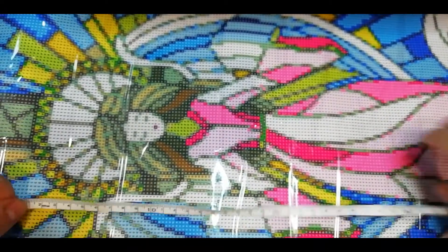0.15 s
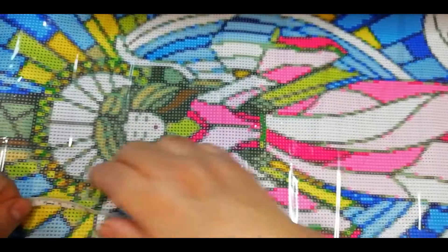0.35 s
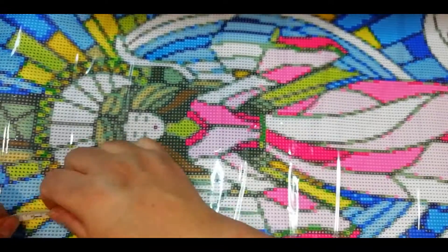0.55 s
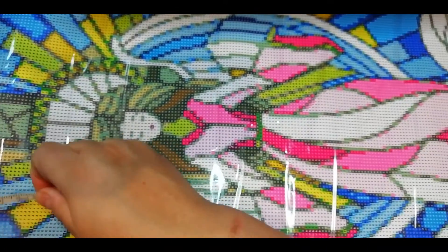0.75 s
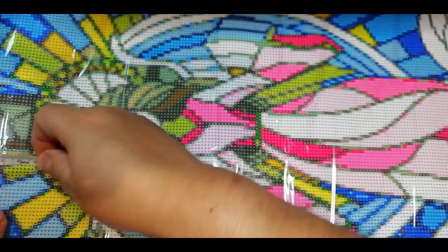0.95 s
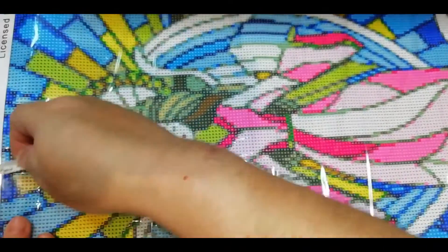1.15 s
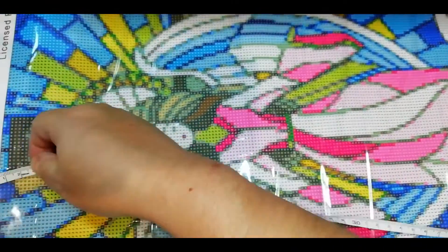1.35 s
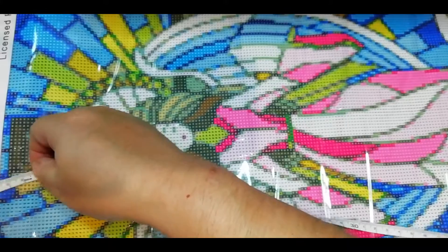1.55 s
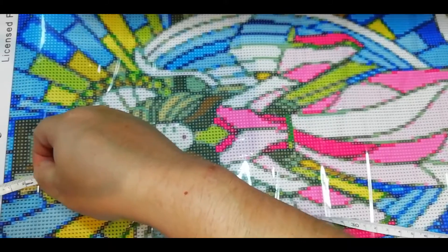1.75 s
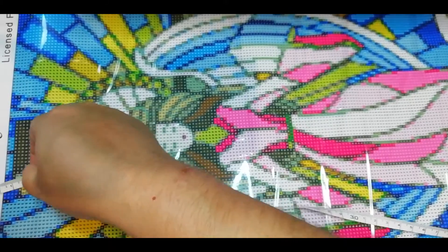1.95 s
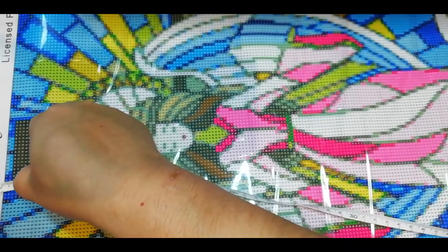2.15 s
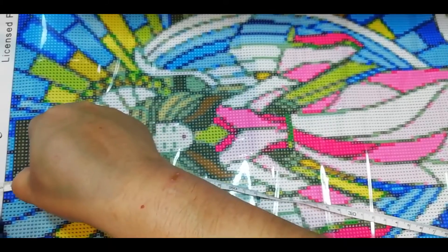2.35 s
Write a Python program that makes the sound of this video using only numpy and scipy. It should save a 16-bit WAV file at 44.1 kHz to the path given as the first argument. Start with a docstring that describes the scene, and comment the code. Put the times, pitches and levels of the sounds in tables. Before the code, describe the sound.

Close, stereo crinkling of thin plastic film on canvas, loudest snap and pock near the start, then a rustling swish, sparse clicks and dull bumps, while a soft tape slides faintly in a small hissy room.

```python
"""Clear film and soft tape on a canvas

A hand presses clear plastic film on a canvas and drags a soft tape over it, close under a phone in a small room.
The film snaps and crackles (bursts of clicks), pocks (short tones), swishes under the fingers (grains and
noise) and squeaks once; the tape slides and something scrapes dully (bands of noise).
The table thumps (fading low tones) and knocks (low noise); a quiet room hiss and a faint shake lie under all.
"""
import sys
import numpy as np
from scipy import signal
from scipy.fft import rfft, irfft, next_fast_len
from scipy.io import wavfile
from scipy.ndimage import map_coordinates

SR = 44100
rng = np.random.default_rng(int(sys.argv[2]) if len(sys.argv) > 2 else 0)


def output_pcm(signal):
    """Save a mono or channel-first signal as 16-bit PCM at the path in sys.argv[1].

    Samples are clipped to [-1, 1] before scaling.
    """
    pcm = np.clip(np.atleast_2d(signal).T, -1, 1) * 32767
    wavfile.write(sys.argv[1], SR, np.round(pcm).astype(np.int16))


N = 110250  # samples, 2.5 s

# Snaps of the film: [t/s, level/dB before room and placing]
FILM_SNAPS = [(0.2065, -26), (0.2509, -14.5), (0.3565, -11.5), (0.3698, -13), (0.4785, -28),
              (0.5642, -21.5), (0.605, -30.5), (0.6925, -22), (0.9896, -31), (1.3057, -19.5),
              (1.3245, -32.5), (1.5369, -23), (1.5446, -27), (1.5825, -24.5), (1.6271, -13),
              (1.6932, -22.5), (1.7731, -25), (1.8346, -23), (1.9334, -30), (2.134, -35.5), (2.2143, -36),
              (2.3312, -41)]
SNAP_MID_DB = -11.5  # the band under the split, against the treble
BURST_S, BURST_DB = 0.0012, -2.5  # time scale of the weaker cracks; their joint energy against the main crack


def snaps():
    """Each snap is one crack amid a tight burst of weaker ones, in the film's colour."""
    out = np.zeros((2, N + SR))
    click = tilted(causal(FILM_COLOUR), amp(SNAP_MID_DB))
    u = np.arange(128) / SR / BURST_S
    for start, db in FILM_SNAPS:
        # cubing the noise makes a few cracks stand out
        burst = u ** 2 * np.exp(-4 * u) * rng.standard_normal(len(u)) ** 3
        burst *= amp(BURST_DB) / np.linalg.norm(burst)
        burst[round(BURST_S * SR / 2)] = 1  # the main crack, where the burst is densest
        snap = amp(db) * np.convolve(click, burst)
        out = placed(out, start + 0.00054, snap, 0)
    return out[:, :N]


# Hollow pocks as film and tape slap the canvas: [t/s, f/Hz, level/dB before swell and placing]
CANVAS_POCKS = [(0.2059, 1950, -16.5), (0.354, 1090, -20), (0.370, 1900, -14), (0.3832, 2860, -5.5),
                (0.4233, 2960, -27), (0.565, 1510, -36.5), (1.132, 2220, -19.5), (1.3118, 925, -27.5),
                (1.537, 3480, -15.5), (1.5384, 990, -31), (1.589, 1090, -39), (1.696, 1060, -23),
                (1.832, 910, -34), (1.841, 920, -34.5), (1.856, 930, -36), (1.9339, 3180, -23.5),
                (2.045, 2440, -36.5), (2.1351, 3180, -27.5), (2.3336, 3950, -31), (2.476, 2890, -39)]
RING_CYCLES = 10  # cycles in which a pock fades by 60 dB
POCK_ROOM_DB = -9


def pocks():
    """Each pock is a few cycles at one pitch, swelling over the first and fading fast."""
    out = np.zeros((2, N + SR))
    t = np.arange(1024) / SR
    for start, hz, db in CANVAS_POCKS:
        fade = amp(db - 60 * t * hz / RING_CYCLES)
        swell = 1 - np.exp(-2 * t * hz)
        ring = fade * swell * np.sin(2 * np.pi * hz * t)
        out = placed(out, start, ring, POCK_ROOM_DB)
    return out[:, :N]


# Strokes of hand and tape over the film:
# [t/s, rise/s, hold/s, fall/s, treble level/dB before placing and flicker, mid band over treble/dB]
HAND_STROKES = [(.0, 0.0027, 0.26, 0.079, -56, 3), (0.15, 0.0045, 0.022, 0.081, -37.5, -12),
                (0.23, 0.02, 0.0098, 0.11, -31.5, -7), (0.353, 0.0026, 0.032, 0.098, -27, -4.5),
                (0.758, 0.031, 0.063, 0.15, -49.5, 1.5), (1.019, 0.11, 0.035, 0.092, -31.5, 2.5),
                (1.309, 0.0036, 0.047, 0.18, -49, -4), (1.432, 0.0035, 0.026, 0.022, -41, -3.5),
                (1.497, 0.058, 0.4, 0.15, -48, 4.5), (1.815, 0.017, 0.027, 0.041, -38, -2.5)]
EDGE_DB = 26  # a stroke rises from this far under its top, and drops this far in its fall time
GRAINS_PER_S, GRAIN_SPREAD_DB, GRAIN_SHARE = 2500, 4, 0.4  # share of the power going into grains
RUSTLE_ROOM_DB = -4


def rustle():
    """Each stroke is tiny crackling grains over friction hiss, in the film's colour."""
    out = np.zeros((2, N + SR))
    colour, size = causal(FILM_COLOUR), SR // 2
    t = np.arange(size) / SR
    for start, rise, hold, fall, db, mid_db in HAND_STROKES:
        chance, strength, sign = rng.random((3, size))
        hits = chance < GRAINS_PER_S / SR
        sizes = amp(-GRAIN_SPREAD_DB * np.log(strength + 0.02))
        grains = unit(hits * sizes * np.sign(sign - 0.5))
        right_grains = np.roll(grains, round(place(start) * LAG_S_PER_DB * SR))
        friction = rng.standard_normal((2, size))
        stroke = np.sqrt(1 - GRAIN_SHARE) * friction + np.sqrt(GRAIN_SHARE) * np.array([grains, right_grains])
        stroke = signal.fftconvolve(stroke, colour[None], axes=1)[:, :size]
        stroke = tilted(stroke, amp(mid_db))

        # distance from the top of the stroke: 0 while held, 1 at the edges
        before = np.clip(1 - t / rise, 0, 1) ** 2.87
        after = np.clip((t - rise - hold) / fall, 0, 10) ** 0.88
        side_db = np.array([[0.5], [-0.5]]) * place(start)
        treble = np.std(filtered(stroke, lambda hz: hz > SPLIT_HZ))
        stroke = stroke / treble * amp(db - EDGE_DB * (before + after) + side_db)
        out[:, round(start * SR):][:, :size] += stroke
    direct = out[:, :N] * amp(1.2 * wobble(80))  # the level flickers a little
    room = signal.fftconvolve(direct.mean(0)[None], tail(), axes=1)[:, :N]
    return direct + amp(RUSTLE_ROOM_DB) * room


# Short squeak of the film: [t/s, length/s, start f/Hz, end f/Hz, level/dB before flicker]
FILM_SQUEAKS = [(0.802, 0.0357, 855, 1370, -50)]


def squeak():
    """A tone gliding from one pitch to another, swelling and fading with a flickering level."""
    out = np.zeros(N + SR)
    t = np.arange(SR // 2) / SR
    for start, length, hz0, hz1, db in FILM_SQUEAKS:
        u = np.clip(t / length, 0, 1)
        level = amp(db + 4 * wobble(300)[:len(t)]) * np.sin(np.pi * u ** 1.6)
        pitch = hz0 + (hz1 - hz0) * u
        out[round(start * SR):][:len(t)] += level * np.sin(2 * np.pi * np.cumsum(pitch) / SR)
    return out[:N]


# The tape drawn along: [t/s, centre f/Hz, level/dB of the middle signal]
TAPE_SLIDE = [(.0, 1295, -60.5), (.33, 1522, -58.5), (0.56, 1400, -60.5), (.68, 1620, -56),
              (1.031, 1424, -59), (1.2, 1494, -75), (1.9, 2451, -64.5), (2.21, 2300, -65.5),
              (2.5, 1758, -73)]
SLIDE_WIDTH_HZ = 356  # between the half-amplitude points


def slide():
    """The sliding tape is a narrow hiss: slow noise moved up to a gliding centre pitch."""
    knots, hz_knots, db_knots = np.transpose(TAPE_SLIDE)
    t = np.arange(N) / SR
    hz, db = np.interp(t, knots, hz_knots), np.interp(t, knots, db_knots)
    slow = rng.standard_normal((4, N))
    a, b, c, d = filtered(slow, lambda f: 1 / (1 + (2 * f / SLIDE_WIDTH_HZ) ** 2))
    phase = 2 * np.pi * np.cumsum(hz) / SR
    mid = unit(a * np.cos(phase) + b * np.sin(phase))
    side = 0.4 * unit(c * np.cos(phase) + d * np.sin(phase))
    return amp(db) * np.array([mid + side, mid - side])


# One dull scrape: [t/s, length/s, centre f/Hz, level/dB at its top]
DULL_SCRAPE = (2.085, .085, 1000, -54)


def scrape():
    """A short grainy band of noise an octave wide, swelling and fading."""
    start, length, hz, db = DULL_SCRAPE
    u = np.clip((np.arange(N) / SR - start) / length, 0, 1)
    grainy = rng.standard_normal((2, N)) ** 3
    band = filtered(grainy, lambda f: 1 / (1 + (f / hz - hz / (f + 1)) ** 2 * 2))
    swell = np.sqrt(np.abs(np.sin(np.pi * u))) * (u < 1)
    return amp(db) * swell * unit(band)


# Low swings of the table: [t/s, f/Hz at the start, level/dB before lift and rise, rise/s, time to fade 60 dB/s]
TABLE_THUMPS = [(0.076, 290, -26.5, 0.016, 0.088), (1.551, 156, -38, 0.0097, 0.1),
                (2.037, 86.5, -23, 0.0088, 0.1), (2.074, 67.5, -22, 0.0035, 0.053),
                (2.104, 89.4, -27, 0.0074, 0.11), (2.198, 46.6, -34, 0.0031, 0.2),
                (2.281, 50.6, -37.5, 0.0087, 0.17)]
THUMP_LIFT_DB = 7.5  # added to every level in the table
SAG = 0.058  # share by which the pitch falls while the thump fades by 60 dB


def thumps():
    """Each thump is a low damped swing of the table whose pitch sags a little."""
    out = np.zeros(N + SR)
    t = np.arange(SR // 2) / SR
    for start, hz, db, rise, t60 in TABLE_THUMPS:
        phase = 2 * np.pi * hz * (t - SAG * t * t / (2 * t60))
        fade = amp(db + THUMP_LIFT_DB - 60 * t / t60)
        swell = (1 - np.exp(-t / rise)) ** 2
        out[round(start * SR):][:len(t)] += fade * swell * np.sin(phase)
    return out[:N]


# Dull knocks of hand on table: [t/s, level/dB before the rise, time to fade 60 dB/s]
TABLE_KNOCKS = [(.0, -44, 0.42), (0.236, -42, 0.28), (0.351, -33, 0.44), (0.477, -40, 0.17),
                (1.31, -43, 0.41), (1.547, -40, 0.18), (2.2, -46, .5)]


def knocks():
    """Each knock is a short burst of the table's low noise, rising at once and dying away."""
    out = np.zeros((2, N + SR))
    t = np.arange(SR // 2) / SR
    for start, db, t60 in TABLE_KNOCKS:
        envelope = amp(db - 60 * t / t60) * (1 - np.exp(-t / 0.00097))
        out[:, round(start * SR):][:, :len(t)] += envelope * low_noise(len(t))
    return out[:, :N]


# Colour of the table's low noise: [f/Hz, relative level/dB per Hz]
TABLE_COLOUR = [(20, -4.5), (130, -2.5), (320, -11), (600, -23.5), (1200, -46)]


def low_noise(n):
    """The table's low noise at level 1: nearly the same left and right in the bass, wider above."""
    mid, side = filtered(rng.standard_normal((2, n)), lambda hz: amp(along(TABLE_COLOUR, hz)))
    side = filtered(side, lambda hz: np.clip(hz / 450, 0, 1))
    return unit(np.array([mid + side, mid - side]))


def table_shake():
    """The table's faint shake is its low noise with a slowly wavering level."""
    shake_db = -59
    return amp(shake_db + 0.94 * wobble(15.43)) * low_noise(N)


# Colour of the room hiss: [f/Hz, relative level/dB per Hz]
HISS_COLOUR = [(180, -40), (300, -8), (597, -12), (848, -3.5), (1110, -7.5), (1830, -10.5), (6240, -13.5),
               (8300, -4.5), (16500, -32.5)]
HISS_DB = -56.5


def room_hiss():
    """Room hiss is steady coloured noise, unrelated at the two microphone ports."""
    noise = rng.standard_normal((2, N))
    return amp(HISS_DB) * unit(filtered(noise, lambda hz: amp(along(HISS_COLOUR, hz))))


# Where the hand works: [t/s, left over right level/dB]
HAND_PLACE = [(0, 1.5), (.44, -0.5), (.55, 8.5), (1.15, 2), (1.47, 1), (1.52, 9.5), (2.5, 6.5)]
LAG_S_PER_DB = 6e-5  # the nearer port hears a sound earlier


def place(s):
    """Left over right in dB at time s."""
    return np.interp(s, *np.transpose(HAND_PLACE))


# How long the room rings: [f/Hz, time to fade 60 dB/s]
ROOM_DECAY = [(500, 0.29), (8000, 0.096), (15000, 0.13)]


def tail(size=12000):
    """A fresh stereo room tail: noise that fades at its own speed in each band, left energy 1."""
    hz, t, bands = signal.stft(rng.standard_normal((2, size)), SR, nperseg=128)
    t60 = np.maximum(along(ROOM_DECAY, hz), 0.02)[:, None]
    _, h = signal.istft(bands * amp(-60 * t / t60), SR, nperseg=128)
    h = h[:, :size]
    return h / np.linalg.norm(h[0])


ROOM_DB = 2.6  # room tail, before each sound's own room level
WALLS_DB, WALLS_S = -3.5, 0.017  # top level of near reflections, and the span of time they spread over


def placed(out, s, body, wet_db):
    """Adds a sound at time s to both ports, with near reflections and a fresh room tail."""
    space = amp(ROOM_DB) * tail()
    delay, strength = np.moveaxis(rng.random((2, 20, 2)), 2, 0)
    both = np.zeros_like(out)
    for ch in range(2):
        at_sample = (40 + delay[ch] * WALLS_S * SR).astype(int)
        # later reflections are weaker; each has a random size and sign
        echoes = amp(WALLS_DB - 10 * delay[ch]) * (2 * strength[ch] - 1)
        np.add.at(space[ch], at_sample, echoes)
        space[ch] *= amp(wet_db)
        space[ch, 0] = amp(place(s) * (1.0 - ch))  # the direct sound
        at = round((s + ch * place(s) * LAG_S_PER_DB) * SR)
        sound = signal.fftconvolve(space[ch], body)
        both[ch, at:at + len(sound)] = sound
    return out + both


# Colour of the film through the microphone: [f/Hz, relative level/dB per Hz]
FILM_COLOUR = [(400, -28.5), (900, -16.5), (1500, -10), (2150, -10.5), (4830, -10), (6800, -7), (8720, 5),
               (11500, -11), (15300, -17), (16500, -41.5)]


def causal(points, size=1024):
    """A click with the given spectrum and its energy as early as possible (minimum phase), peak 1."""
    spectrum = amp(along(points, np.fft.rfftfreq(size, 1 / SR)))
    cepstrum = irfft(np.log(np.maximum(spectrum, 1e-4)), size)
    cepstrum[1:size // 2] *= 2
    cepstrum[size // 2 + 1:] = 0
    h = irfft(np.exp(rfft(cepstrum)), size)[:size // 2]
    return h / np.abs(h).max()


SPLIT_HZ = 4850  # between mid band and treble


def tilted(x, mid_gain):
    """Sets the level of the band under the split against the treble."""
    def low_pass(hz):
        return 1 / (1 + 1j * hz / SPLIT_HZ - (hz / SPLIT_HZ) ** 2)

    mid = filtered(x, low_pass)
    high = filtered(x, lambda hz: -(hz / SPLIT_HZ) ** 2 * low_pass(hz))
    return unit(mid) * mid_gain * np.std(high) - high


def filtered(x, response):
    """Multiplies the spectrum of x by a response, given as a function of frequency."""
    n = x.shape[-1]
    m = next_fast_len(n + 8192)  # spare room for the filter to ring out
    return irfft(rfft(x, m) * response(np.fft.rfftfreq(m, 1 / SR)), m)[..., :n]


def wobble(rate):
    """A smooth random curve with rate knots a second."""
    knots = rng.standard_normal(int(N * rate / SR) + 4)
    return map_coordinates(knots, [np.arange(N) * rate / SR])


def along(points, hz):
    """Reads a (Hz, value) table at any frequency, on a log frequency axis."""
    f, v = np.transpose(points)
    return np.interp(np.log(hz + 1), np.log(f + 1), v)


def amp(db):
    """Decibels to a plain factor."""
    return 10 ** (np.asarray(db) / 20)


def unit(x):
    """Scales x to an RMS level of 1."""
    return x / np.sqrt(np.mean(x ** 2) + 1e-20)


def scene():
    """All layers together."""
    film = snaps() + pocks() + rustle() + squeak()
    tape = slide() + scrape()
    table = thumps() + knocks() + table_shake()
    return film + tape + table + room_hiss()


def record(dry):
    """The phone keeps nothing above its band limit."""
    return filtered(dry, lambda hz: hz < 16800)


dry = scene()
out = record(dry)
output_pcm(out)
```